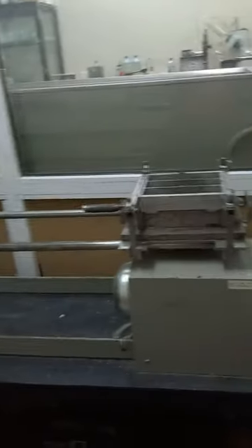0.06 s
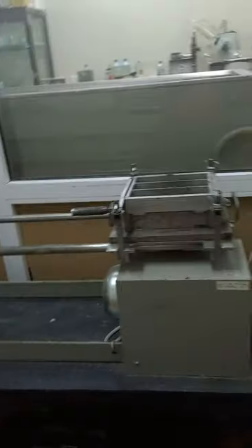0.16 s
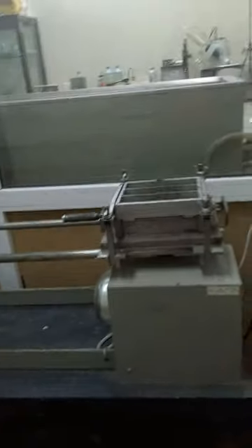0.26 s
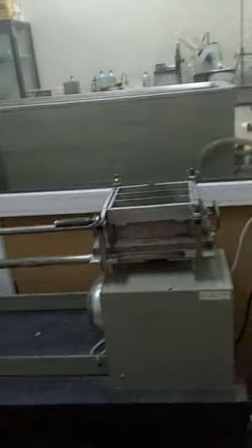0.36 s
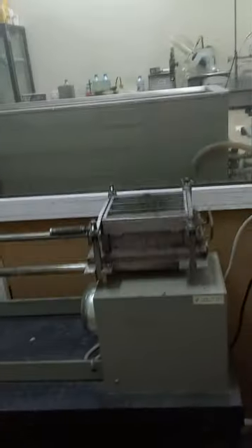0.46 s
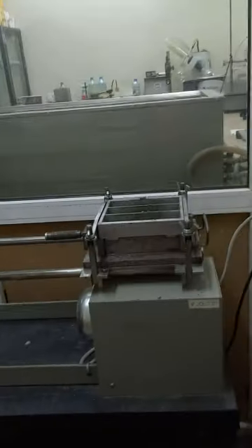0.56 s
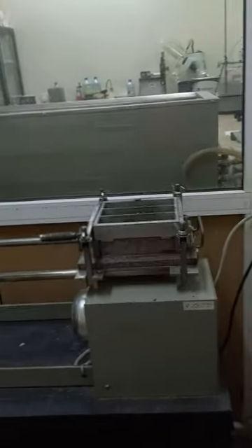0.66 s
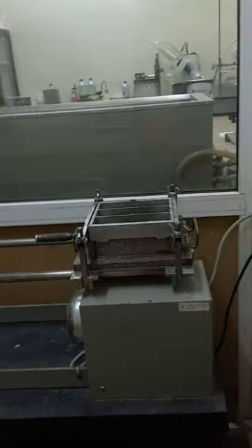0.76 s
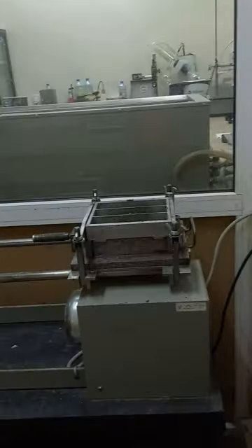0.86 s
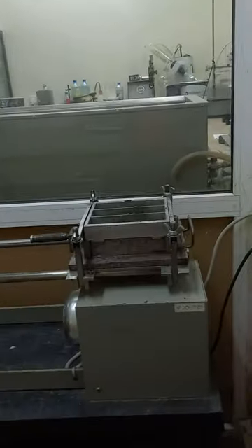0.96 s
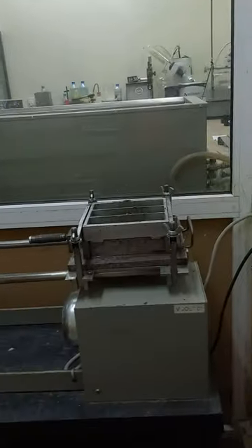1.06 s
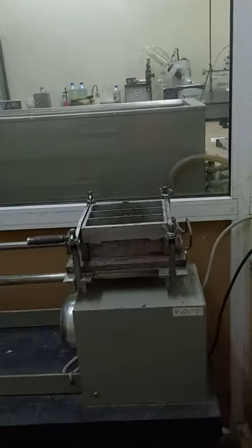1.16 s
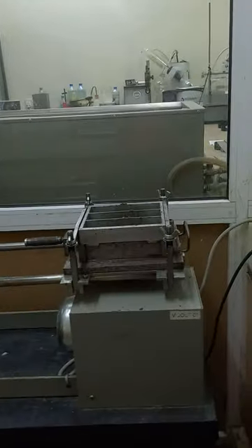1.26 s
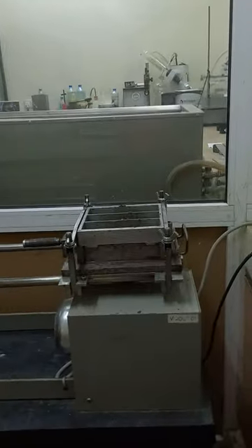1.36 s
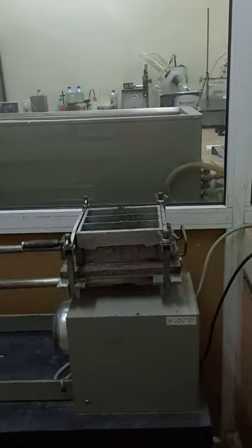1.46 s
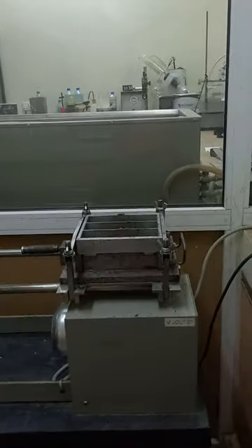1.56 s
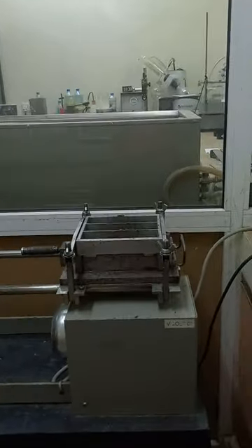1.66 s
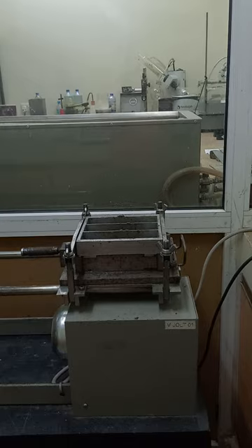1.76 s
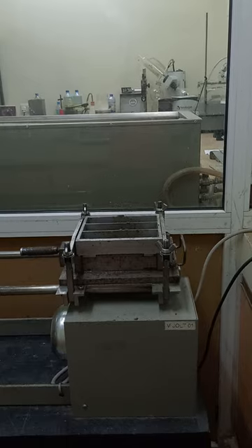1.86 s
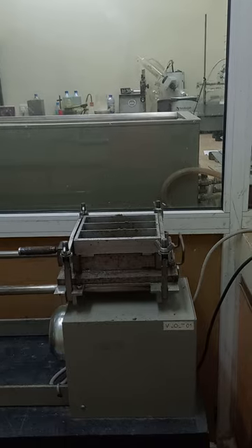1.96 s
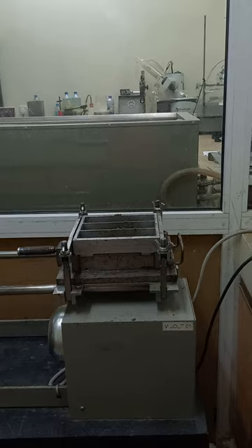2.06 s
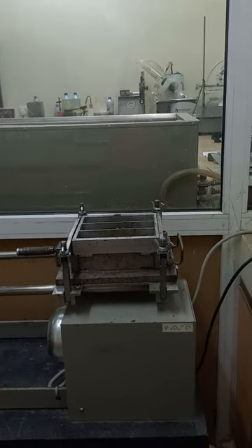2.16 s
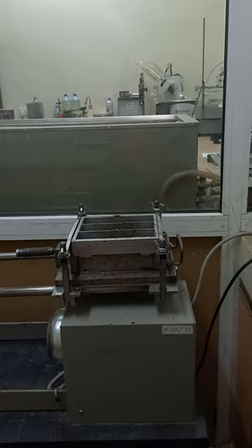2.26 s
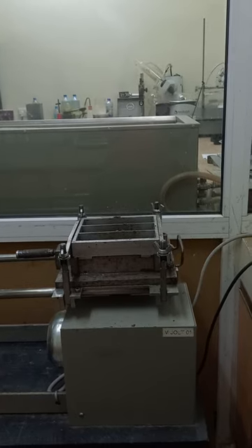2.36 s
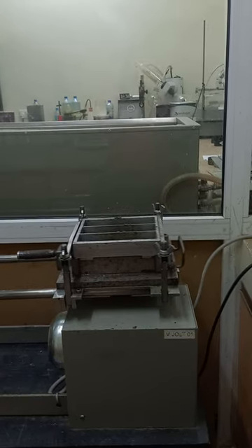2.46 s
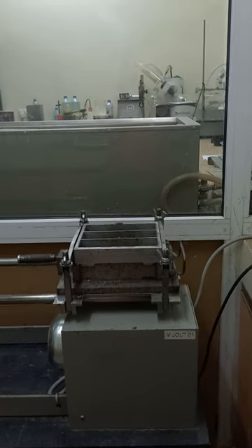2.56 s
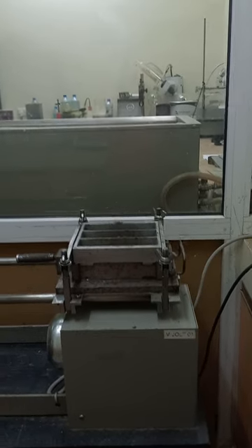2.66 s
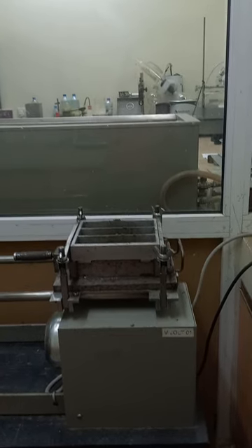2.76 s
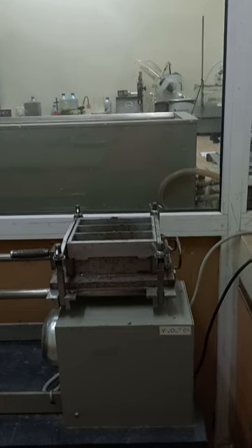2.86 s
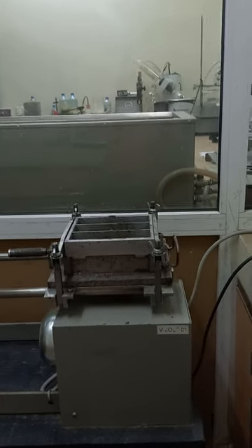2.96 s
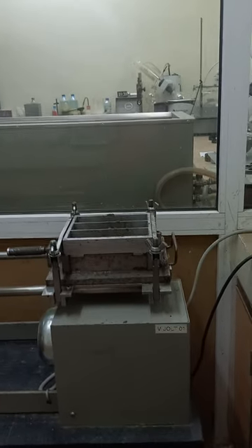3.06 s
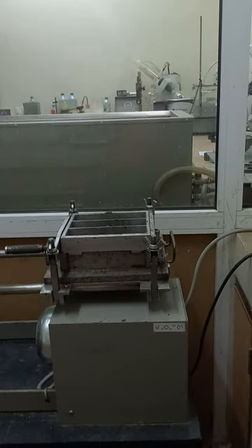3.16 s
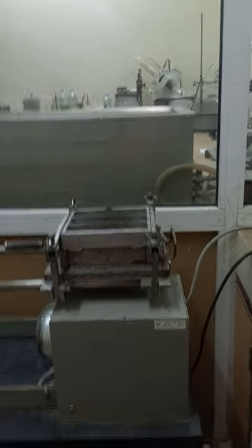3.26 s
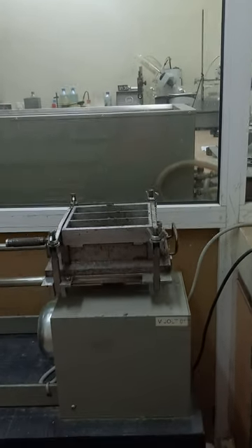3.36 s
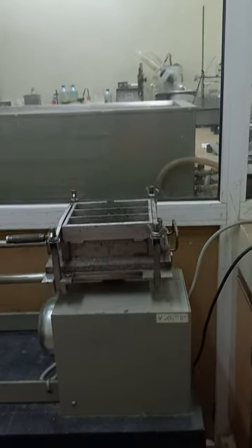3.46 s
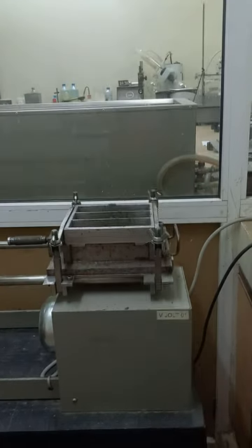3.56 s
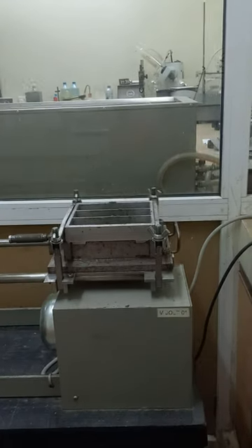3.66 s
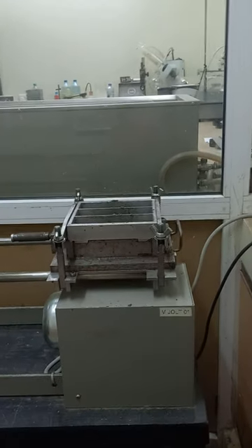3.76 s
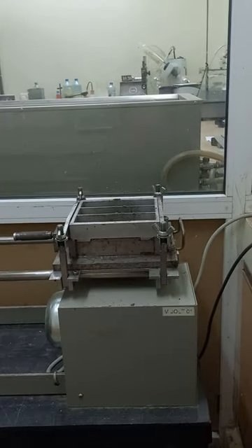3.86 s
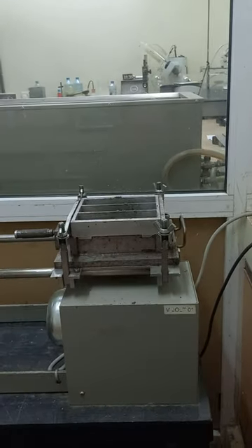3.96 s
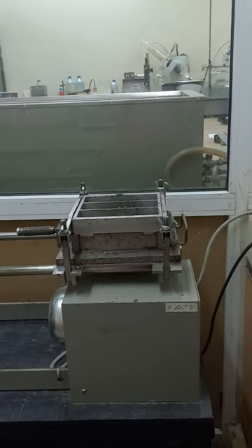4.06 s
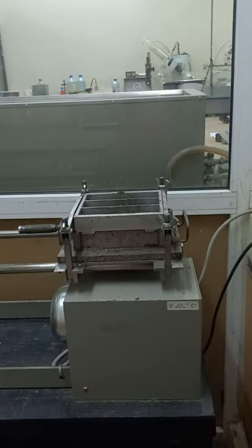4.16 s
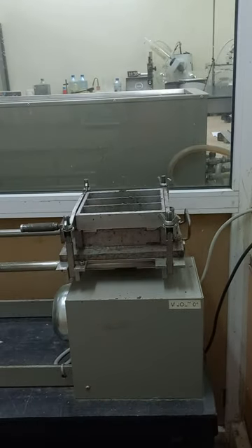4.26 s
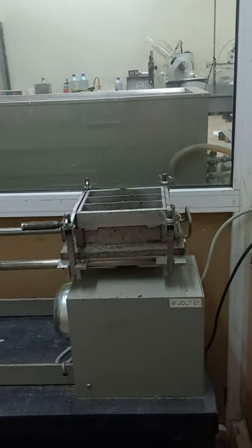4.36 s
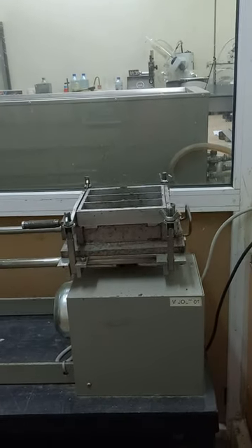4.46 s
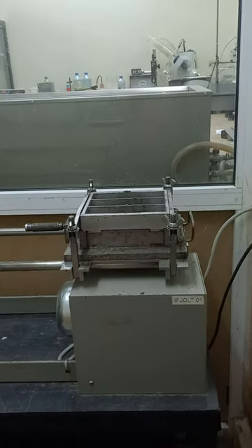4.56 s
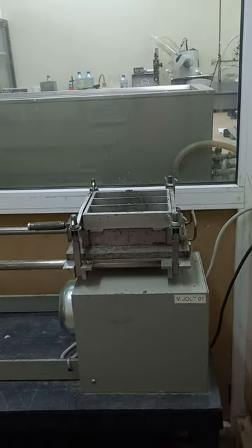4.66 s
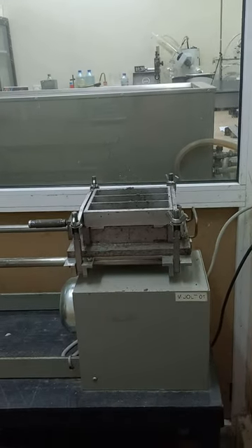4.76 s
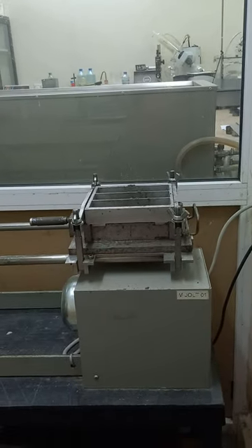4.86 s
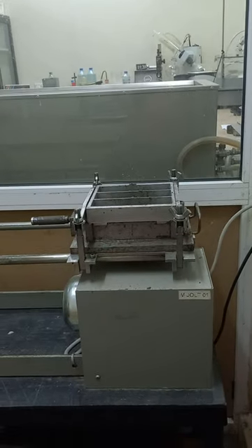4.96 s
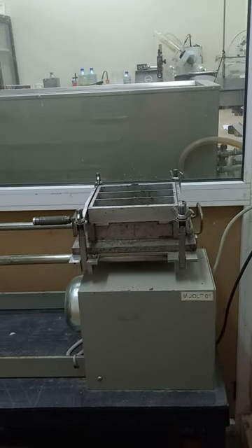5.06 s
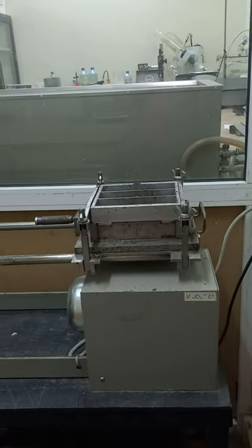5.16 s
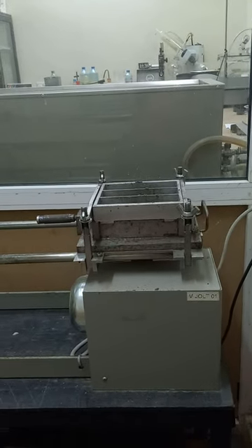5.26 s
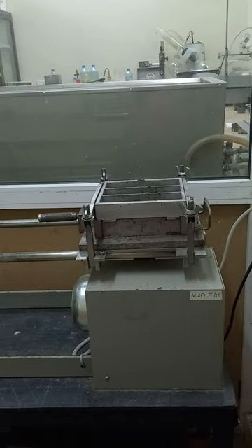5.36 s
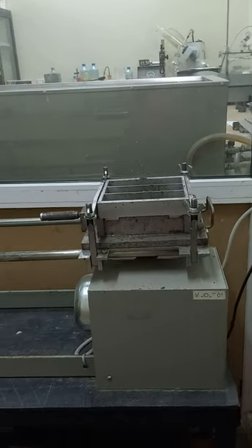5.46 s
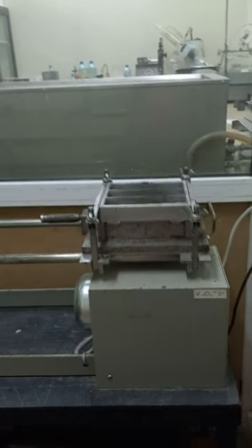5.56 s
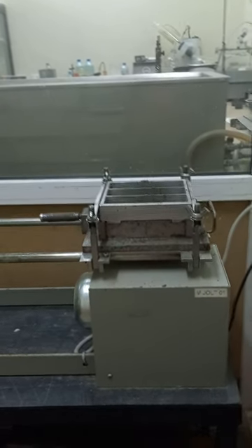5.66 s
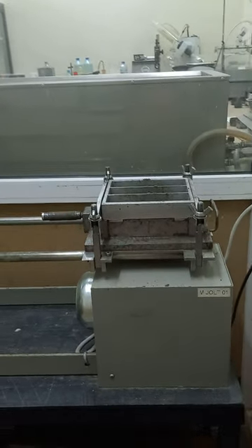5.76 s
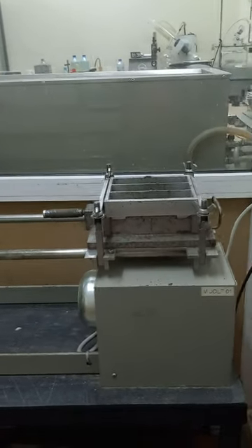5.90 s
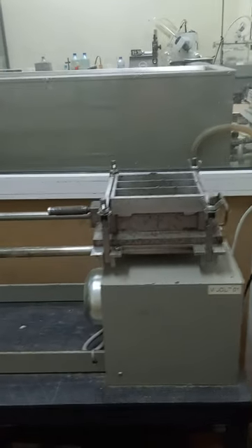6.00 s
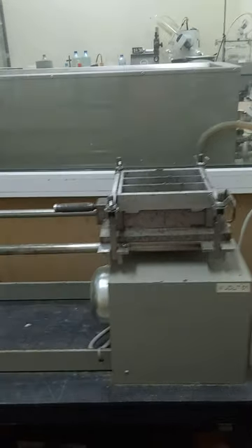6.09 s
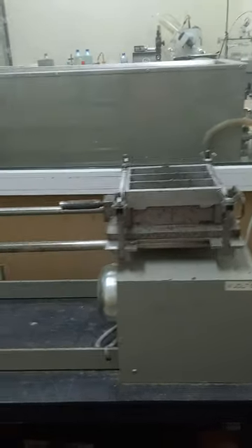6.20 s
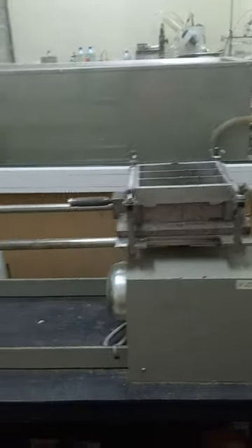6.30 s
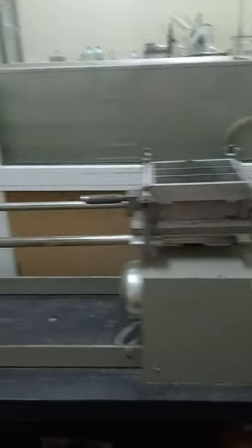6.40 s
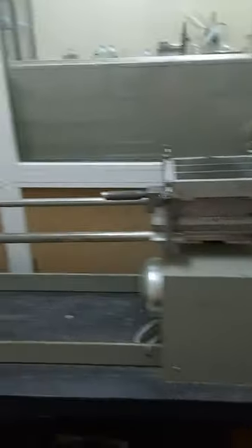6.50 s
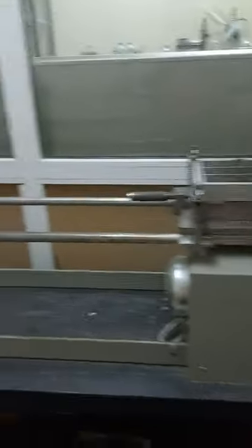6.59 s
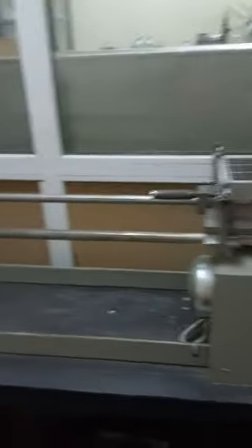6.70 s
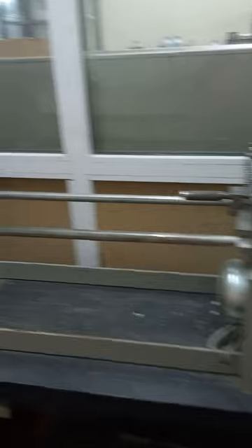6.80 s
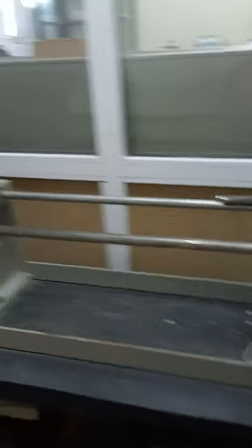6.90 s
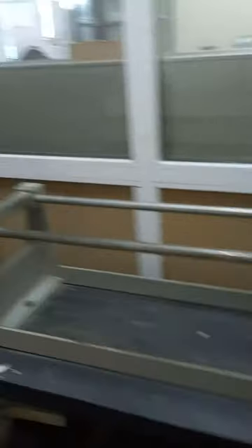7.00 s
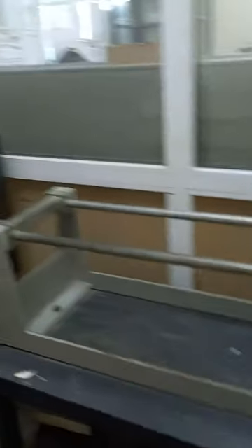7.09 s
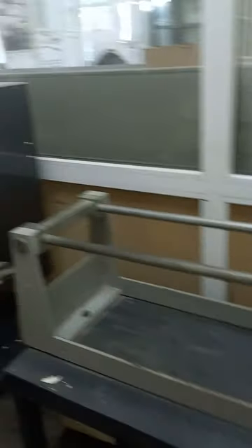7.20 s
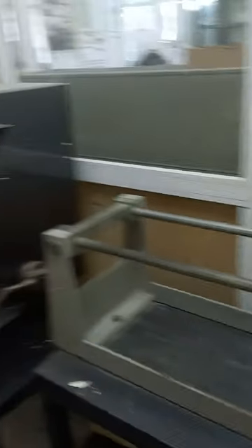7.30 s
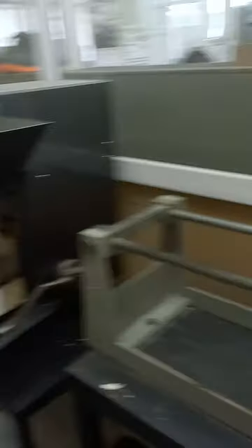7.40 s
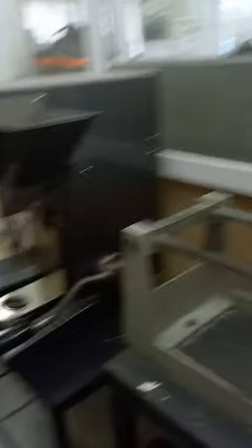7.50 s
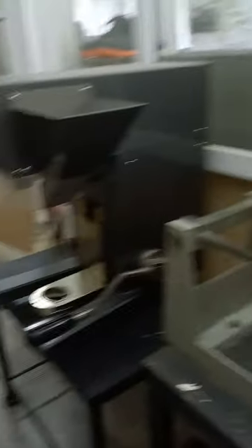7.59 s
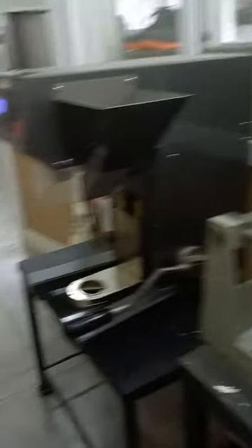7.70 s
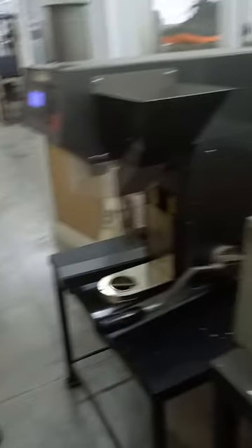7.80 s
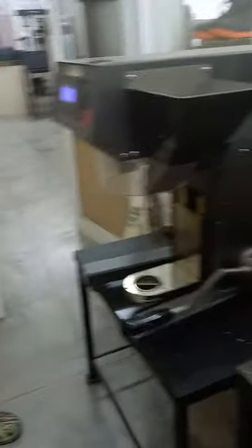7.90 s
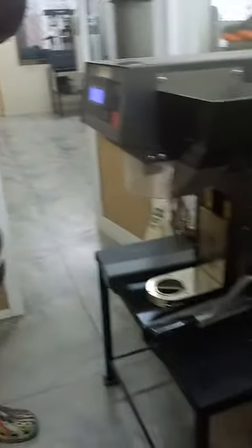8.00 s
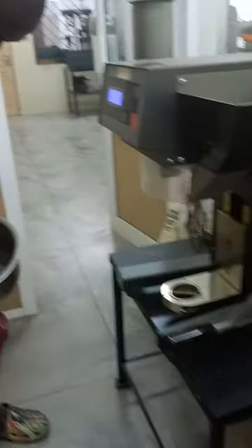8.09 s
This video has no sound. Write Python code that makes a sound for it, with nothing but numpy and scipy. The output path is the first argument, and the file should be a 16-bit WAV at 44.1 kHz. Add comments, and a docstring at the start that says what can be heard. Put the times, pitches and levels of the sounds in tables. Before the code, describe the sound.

Loud, evenly spaced steel clangs dominate, peaks held down as if near the recorder's limit, their tails overlapping in a reverberant room. Quieter, uneven hisses of sand and short metallic scoop scrapes fill the gaps over a low motor whirr. A dull bump comes late, and the last blows have a fuller thud and more resonant steel arms. Stereo, close to the machine.

```python
"""About once a second a heavy steel blow clangs and rings through a hard-walled cement laboratory.
A jolting table drops its mould on the stop: ringing modes, noise for crack and thud, a limiter on the peaks.
Between the blows something gritty, probably sand, is scooped and poured: shaped, uneven noise with an echo.
A motor whirrs and hums; of two deep, short pushes of noise one falls under a blow. Later the listening spot
moves along the long arms, which then ring louder."""
import sys
import numpy as np
from scipy import signal
from scipy.fft import rfft, irfft, next_fast_len
from scipy.io import wavfile
from scipy.ndimage import uniform_filter1d, minimum_filter1d, map_coordinates

SR = 44100
rng = np.random.default_rng(int(sys.argv[2]) if len(sys.argv) > 2 else 0)


def generate_wav(sig):
    """Save sig (samples, or channels by samples) to the path in sys.argv[1] as 16-bit PCM at SR."""
    pcm = np.round(np.clip(np.atleast_2d(sig).T, -1, 1) * 32767).astype(np.int16)
    wavfile.write(sys.argv[1], SR, pcm)


N = 358974  # length of the scene in samples
AGE = np.arange(2 * SR) / SR  # time since a sound began [s]

# how alike the room makes left and right: (frequency [Hz], likeness [0 to 1])
LIKENESS = [(100, 0.98), (250, 0.87), (400, 0.84), (600, 0.32), (1000, 0.065), (15000, 0)]


def amp(db):
    """Turn decibels into a gain."""
    return 10 ** (np.asarray(db) / 20)


def unit(x):
    """Scale to an average strength (rms) of 1."""
    return x / np.sqrt(np.mean(x ** 2) + 1e-20)


def along(points, hz):
    """Read a value between (frequency, value) points on a logarithmic frequency axis."""
    f, v = np.transpose(points)
    return np.interp(np.log(hz + 1), np.log(f + 1), v)


def filtered(x, response):
    """Make each frequency louder or softer, as the response function says."""
    size = x.shape[-1]
    padded = next_fast_len(size + 8192)
    spectrum = rfft(x, padded) * response(np.fft.rfftfreq(padded, 1 / SR))
    return irfft(spectrum, padded)[..., :size]


def half_angle(hz):
    """Half the phase angle whose cosine is the left-right likeness."""
    return np.arccos(np.clip(along(LIKENESS, hz), -1, 1)) / 2


def noise(spectrum, size):
    """Stereo noise of rms 1 as a room delivers it: alike in the bass, unrelated above."""
    def mid_and_side(hz):
        shares = np.array([np.cos(half_angle(hz)), np.sin(half_angle(hz))])
        return amp(along(spectrum, hz)) * shares

    mid, side = filtered(rng.standard_normal((2, size)), mid_and_side)
    return unit(np.array([mid + side, mid - side]))


def dying(x):
    """Let each frequency fade at the room's own speed, as walls and air soak it up."""
    # how long the room rings: (frequency [Hz], time to fade by 60 dB [s])
    room_fading = [(60, 0.34), (180, 1.9), (400, 0.94), (900, 0.88), (2500, 0.74), (5000, 0.65),
                   (9000, 0.6), (15000, 0.34)]
    hz, t, z = signal.stft(x, SR, nperseg=512)
    faded = z * amp(-60 * t / along(room_fading, hz)[:, None])
    return signal.istft(faded, SR, nperseg=512)[1][:, :x.shape[-1]]


def add(track, s, sound):
    """Mix a sound into the track at time s [s], cutting what falls outside."""
    start = round(s * SR)
    part = sound[:, max(-start, 0):max(N - start, 0)]
    track[:, max(start, 0):max(start, 0) + part.shape[1]] += part


def envelope(rise, length, fall):
    """Loudness shape: rise, hold until length has passed, then die away (all in seconds)."""
    t = AGE[AGE < length + 10 * fall]
    return np.minimum(t / rise, 1) * np.exp(-np.maximum(t - length, 0) / fall)


def motor(air_db=-49, hum_hz=100, hum_db=-63):
    """Motor and ventilation: a steady whirr of noise plus mains hum, a single pure tone."""
    # colour of the whirr: (frequency [Hz], relative level [dB per Hz])
    air_colour = [(15, -70), (30, -46), (60, -49), (100, -6), (140, -26), (200, -1.5), (300, -5),
                  (450, -11), (700, -9.5), (1400, -19.5), (2400, -16.5), (4300, -21), (6500, -32),
                  (15000, -39)]
    hum = np.sin(2 * np.pi * hum_hz * np.arange(N) / SR)
    return amp(air_db) * noise(air_colour, N) + amp(hum_db) * hum


def bumps(rise=0.014, fall=0.054):
    """Dull low bumps: short, deep pushes of noise with no ring, one of them under a blow."""
    # when the bumps come: (time [s], level [dB])
    bump_times = [(1.15, -48), (6.631, -34.5)]
    # colour of a bump: (frequency [Hz], relative level [dB per Hz])
    bump_colour = [(20, -19), (45, -10), (65, 0), (95, 2), (140, -12), (300, -60), (1000, -120)]
    out = np.zeros((2, N))
    shape = envelope(rise, rise, fall)
    for s, db in bump_times:
        add(out, s, amp(db) * shape * noise(bump_colour, len(shape)))
    return out


def gritty(spectrum, size, grain_db=2.0):
    """Countless grains colliding: a hiss whose strength changes every few milliseconds."""
    clumps = unit(uniform_filter1d(rng.standard_normal(size), size=120))
    return unit(noise(spectrum, size) * amp(grain_db * clumps))


def flow(rise=0.026, fall=0.012, lump_rise=0.03, lump_fall=0.014, flutter_db=3.9, flutter_per_s=16):
    """How strongly sand runs at each moment: pours and lumps add as power, and flutter makes them uneven."""
    # sand runs off the scoop, as a stream or a trickle:
    # (time [s], length [s], starting level [dB], growth [dB per s])
    pours = [(0.64, 0.36, -33.5, -3.5), (1.13, 0.098, -58, 0), (2.66, 0.82, -35, 6),
             (4.227, 0.22, -51, -22), (4.76, 0.25, -45.5, -25), (5.755, 0.857, -37.5, 8.5),
             (5.873, 0.097, -27.5, 28), (7.017, 0.7, -68.5, 10), (7.705, 0.099, -27, 4)]
    # a lump of sand slides off at once: (time [s], level [dB])
    lumps = [(0.76, -29), (1.76, -35.5), (2.68, -22), (3.111, -21), (4.338, -35.5), (4.712, -32.5)]
    power = np.zeros((1, N))
    for s, length, db, growth in pours:
        shape = envelope(rise, length, fall)
        strength = shape * amp(db + growth * AGE[:len(shape)])
        add(power, s, strength[None] ** 2)
    lump_shape = envelope(lump_rise, lump_rise, lump_fall)
    for s, db in lumps:
        add(power, s, (amp(db) * lump_shape)[None] ** 2)
    # a smooth curve through random values
    flutter = map_coordinates(rng.standard_normal(SR), [np.arange(N) / SR * flutter_per_s])
    return np.sqrt(power) * amp(flutter_db * flutter)


def stroke(rise, fall, blade_db, ring_db, ring_hz, hollow_db=0.5, hollow_hz=2330, ring_width_hz=220):
    """One stroke of the scoop: grit rubs on the steel blade and makes it sing."""
    # colour of the rubbing grit: (frequency [Hz], relative level [dB per Hz])
    grit_colour = [(60, -68), (300, -2), (1200, 0.5), (3000, 1), (6500, 0.5), (9000, 2.5), (15000, 2)]
    # colour of the rubbed blade: (frequency [Hz], relative level [dB per Hz])
    blade_colour = [(60, -70), (200, -31), (450, 8.5), (700, -22), (1300, -9), (1750, -6.5), (2700, -6),
                    (3600, -10), (12000, -14)]
    force = envelope(rise, rise, fall)
    rub = gritty(grit_colour, len(AGE)) + amp(blade_db) * gritty(blade_colour, len(AGE))
    rub = rub[:, :len(force)]
    # the echo inside the scoop stresses multiples of its hollow pitch
    rub = filtered(rub, lambda hz: amp(hollow_db * np.cos(2 * np.pi * hz / hollow_hz)))
    # where the blade touches decides which of its modes sings
    singing = lambda hz: 1 + amp(ring_db) / (1 + ((hz - ring_hz) / ring_width_hz) ** 2)
    return force * filtered(rub, singing)


def sand(stroke_db=-2, room_db=0, direct_db=-4):
    """A scoop bites into sand, scrapes on and pours it out, a few steps away in the echoing room."""
    # colour of running sand: (frequency [Hz], relative level [dB per Hz])
    sand_colour = [(60, -64), (200, -22), (450, 8.5), (800, -6), (1200, 0), (2500, -6.5), (4200, -6.5),
                   (6000, -8.5), (7200, -1), (8500, 6.5), (9600, -2), (13000, 3.5), (16000, 4.5)]
    # the scoop stabs into the sand:
    # (time [s], relative level [dB], rise [s], fall [s], blade ring [Hz])
    bites = [(0.123, -23, 0.011, 0.052, 4770), (2.031, -26.5, 0.001, 0.073, 3240),
             (4.562, -26, 0.0035, 0.043, 4700), (5.15, -20, 0.012, 0.029, 3300),
             (7.628, -25.5, 0.015, 0.017, 3400), (8.069, -19.5, 0.0036, 0.021, 3560)]
    # the scoop is pushed on along the bottom: (time [s], relative level [dB], swell [s])
    scrapes = [(0.272, -23, 0.04), (2.151, -27.5, 0.021), (5.28, -23, 0.016), (5.92, -25.5, 0.067)]
    near = flow() * gritty(sand_colour, N)
    for s, db, rise, fall, ring_hz in bites:
        # a stab is mostly grit
        bite = stroke(rise, fall, blade_db=-9.5, ring_db=1, ring_hz=ring_hz)
        add(near, s, amp(db + stroke_db) * bite)
    for s, db, swell in scrapes:
        # a push makes the blade sing
        scrape = stroke(swell, 0.58 * swell, blade_db=-4.5, ring_db=5.5, ring_hz=1830)
        add(near, s, amp(db + stroke_db) * scrape)
    tail = dying(rng.standard_normal((2, SR)))
    echo = signal.fftconvolve(near, tail / np.linalg.norm(tail[0]), axes=1)[:, :N]
    return amp(direct_db) * near + amp(room_db) * echo


def mode(hz, t60, build):
    """One ringing mode: its standing wave builds up and meets the two microphones in different phase."""
    spread = rng.choice([-1, 1]) * half_angle(hz)
    phase = rng.uniform(0, 2 * np.pi) + spread * np.array([[1], [-1]])
    fading = amp(-60 * AGE / t60)
    return np.sin(2 * np.pi * hz * AGE + phase) * fading * (1 - np.exp(-AGE / build))


def ring(modes, build):
    """All modes of one part, struck together."""
    return sum(amp(db) * mode(hz, t60, build) for hz, db, t60 in modes)


def wash(first_share=0.78, build=0.0012):
    """The clang's crowd of blended modes: they swell as the walls answer, then die with the room."""
    # colour of the clang: (frequency [Hz], relative level [dB per Hz])
    clang_colour = [(20, -65), (50, -18), (85, -20), (115, -17.5), (150, -14.5), (200, -2.5), (290, -4),
                    (400, 2), (650, 0), (1100, -6.5), (2600, -9), (4500, -13.5), (7000, -20.5),
                    (15000, -21)]
    swell = 1 - (1 - first_share) * np.exp(-AGE / build)
    return dying(noise(clang_colour, len(AGE))) * swell


def jolts(frame_db=4.5, bench_db=2, wash_db=-12, fresh_db=-10, arm_db=-18, arm_far_db=17,
          arm_right_db=2.0, repeat_hz=2000, crack_db=-14, crack_t60=0.17, thud_db=-14, thud_t60=0.73):
    """The cam drops the mould alike every turn: the bass repeats, the treble rattles anew."""
    # one row for each turn: (strength [dB], relative bench thud [dB], relative crack [dB])
    drops = [(0, -17, 0), (-2, -19, 0), (-1.54, -14, 1.5), (-1, -20.5, 0.5), (-1.5, -16, -3), (-1, -16, -3),
             (-1.2, -10, 1), (-2, -4, -0.5), (-2, -9.5, 2)]
    # the mould hops and lands again: (time after the drop [s], level against the drop [dB])
    hops = [(.05, -14), (.075, -30.5), (.115, -37)]
    # modes of the steel frame and mould:
    # (frequency [Hz], relative level [dB], time to fade by 60 dB [s])
    frame_modes = [(322.7, -17, 0.64), (325, -15, 0.65), (334.5, -17, 0.74), (352.8, -25, 1.04),
                   (379, -22, 0.44), (413.6, -22, 0.54), (421, -13, 0.42), (443, -26, 1.25),
                   (457, -29, 1.28), (468.2, -19.5, 1.204), (477, -48, 0.8), (544, -47, 0.72),
                   (575, -15, 0.43), (621, -16, 0.63), (616, -34.5, 1.5), (589, -34.5, 1.4),
                   (708, -42, 2.2), (787, -26, 1.17), (841, -24, 0.82), (882, -35, 1.1),
                   (1048, -24.5, 0.86), (1250, -36, 0.72), (1392, -20.5, 0.54), (1380, -40, 1.1),
                   (1500, -27, 0.89), (1550, -52, 2.8), (1955, -31, 1.11), (2220, -22.5, 0.5),
                   (2356, -20.5, 0.62), (2740, -39.5, 1.85)]
    # deep modes of the bench: (frequency [Hz], relative level [dB], time to fade by 60 dB [s])
    bench_modes = [(111.7, -27, 0.86), (130.2, -33, 0.63), (170, -33, 1.1), (183, -26, 1.16),
                   (199, -25.5, 0.66), (217, -58, 1.5), (243, -45, 0.077), (241, -20.5, 0.53),
                   (277.8, -31, 1.88)]
    # bending modes of the long arms: (frequency [Hz], relative level [dB], time to fade by 60 dB [s])
    arm_modes = [(263.5, -7, 1), (347, -4, 1.05), (368.3, 0, 1.8), (743, -11, .85)]
    # colour of steel on steel: (frequency [Hz], relative level [dB per Hz])
    crack_colour = [(100, -29), (400, -22), (1200, -16), (2700, 13), (6000, -18), (8600, 3.5), (15000, -29)]
    # colour of the bench thud: (frequency [Hz], relative level [dB per Hz])
    thud_colour = [(25, -28), (45, -14), (65, 0), (100, -2), (200, 23), (400, -20)]
    # a hop's colour against a full drop: (frequency [Hz], gain [dB])
    landing_colour = [(120, -40), (330, -10), (470, 1.5), (660, -0.5), (1000, -2.5), (3000, 1), (15000, -3)]
    # the listening spot: (time [s], place [0 at the mould to 1 at the far end of the arms])
    listening_spot = [(0.5, 0.21), (4.6, 0.067), (6.6, 0.62), (7.6, 0.53)]
    first_drop_s, turn_s = -0.4808, 1.0158  # the table is already running at the start

    out = np.zeros((2, N))
    usual = amp(frame_db) * ring(frame_modes, build=0.04)
    usual = usual + amp(bench_db) * ring(bench_modes, build=0.0048) + amp(wash_db) * wash()
    arm_sides = amp(np.array([[-.5], [.5]]) * arm_right_db)
    arms = ring(arm_modes, build=0.017) * arm_sides
    for turn, (db, knock_db, contact_db) in enumerate(drops):
        s = first_drop_s + turn * turn_s
        moved = np.interp(s, *np.transpose(listening_spot))
        # from another spot the standing waves are heard in a new mix
        kept = lambda hz: np.sqrt(1 - moved ** 2) / np.sqrt(1 + (hz / repeat_hz) ** 4)
        renewed = lambda hz: np.sqrt(1 - kept(hz) ** 2)
        body = filtered(usual, kept) + amp(fresh_db) * filtered(wash(), renewed)
        crack = amp(crack_db + contact_db - 60 * AGE / crack_t60) * noise(crack_colour, len(AGE))
        thud = amp(thud_db + knock_db - 60 * AGE / thud_t60) * noise(thud_colour, len(AGE))
        thud = thud * (1 - np.exp(-AGE / 0.0092))
        # the arms ring louder towards their far end
        heard_arms = amp(arm_db + arm_far_db * moved) * arms
        add(out, s, amp(db) * (body + crack + thud + heard_arms))
        for delay, hop_db in hops:
            # a light landing rings the mould's box but is too weak to shake the bench
            landing = filtered(wash(), lambda hz: amp(along(landing_colour, hz)))
            add(out, s + delay, amp(db + hop_db) * landing)
    return out


def scene():
    """Motor, bumps, sand and table together, each band leaning a little to one side."""
    # how far each band leans: (frequency [Hz], left minus right [dB])
    side_balance = [(150, 1.5), (260, 1), (370, -1.5), (550, 0), (1000, 1), (2200, -3.5), (4000, -1.5),
                    (8000, 1.5), (15000, 1.2)]
    lean = lambda hz: amp(along(side_balance, hz) * np.array([[.5], [-.5]]))
    return filtered(motor() + bumps() + sand() + jolts(), lean)


def record(dry, ceiling=1.0, hold_s=0.012, low_hz=45, top_hz=15800):
    """The microphone sheds the deepest bass, the limiter holds the blows down, and the treble ends steeply."""
    heard = filtered(dry, lambda hz: (1j * hz / (1j * hz + low_hz)) ** 2)
    span = max(int(hold_s * SR), 2)
    needed = np.minimum(1, ceiling / (np.abs(heard).max(axis=0) + 1e-9))
    # spread the lowest gain around each peak, then smooth it
    gain = uniform_filter1d(minimum_filter1d(needed, span), span)
    return filtered(heard * gain, lambda hz: 1 / np.sqrt(1 + (hz / top_hz) ** 240))


dry = scene()
out = record(dry)
generate_wav(out)
```